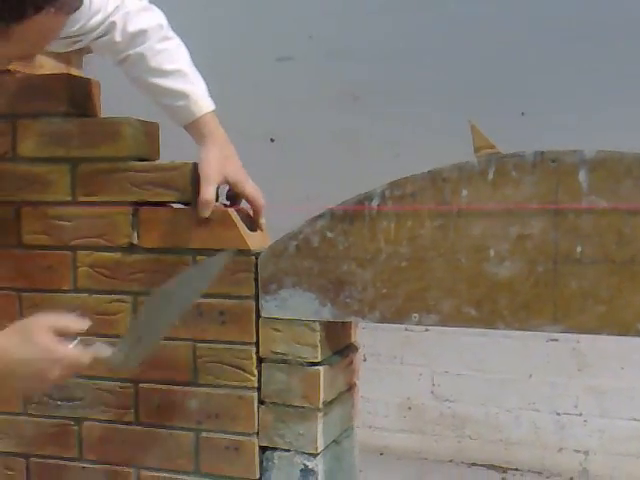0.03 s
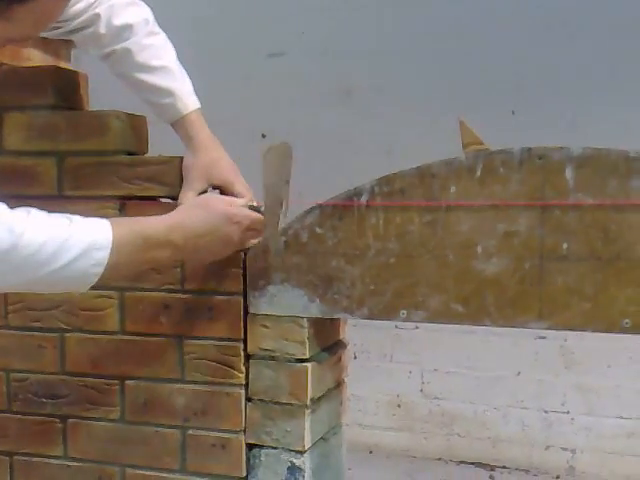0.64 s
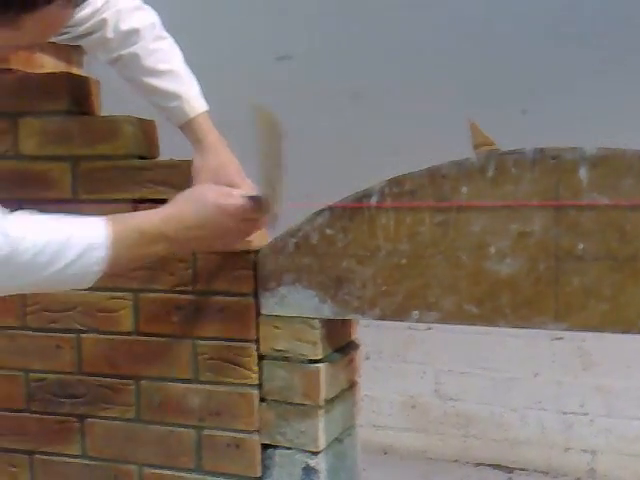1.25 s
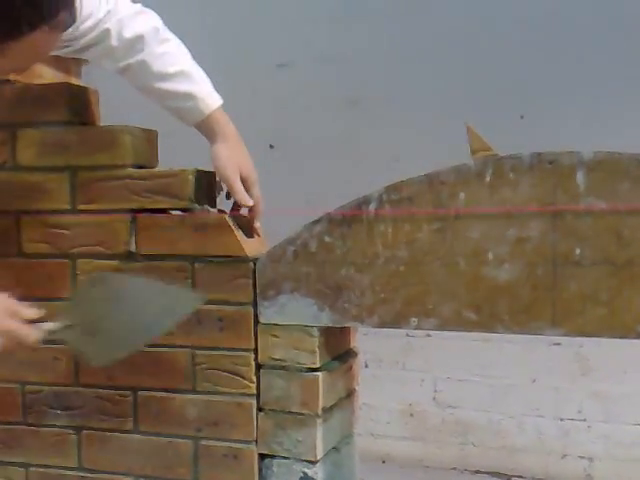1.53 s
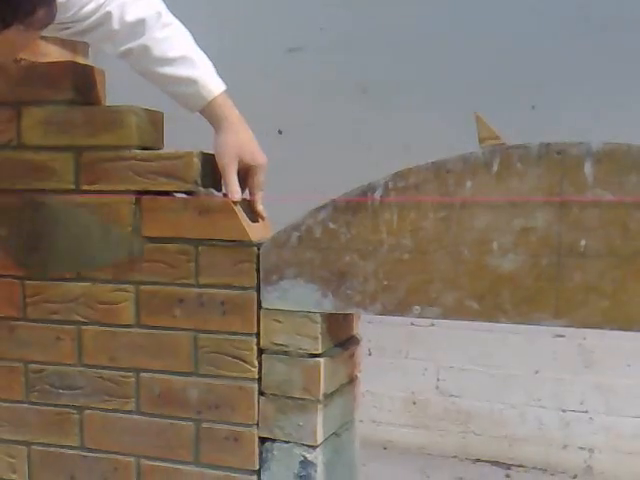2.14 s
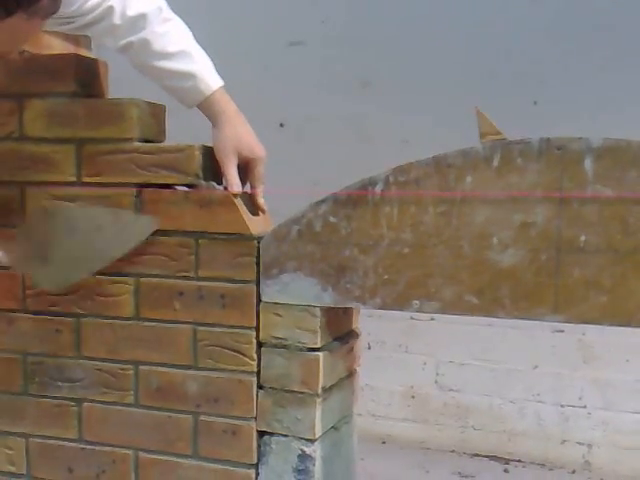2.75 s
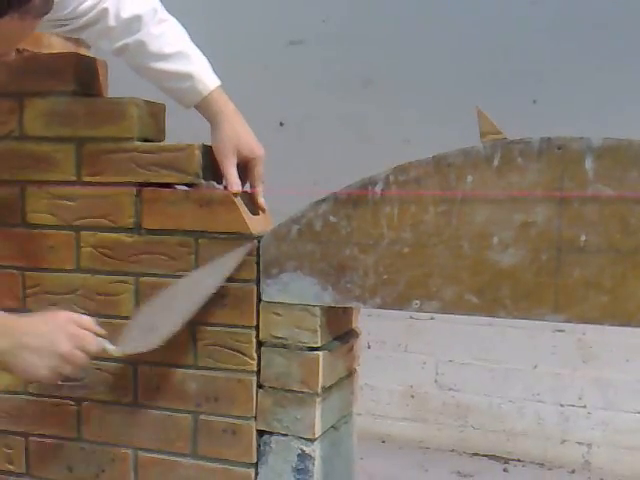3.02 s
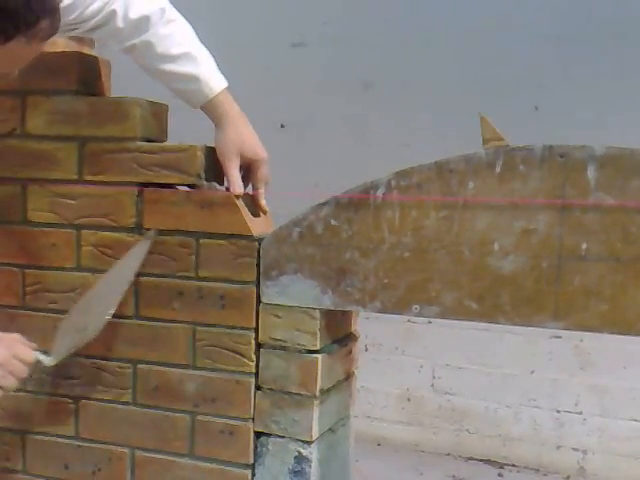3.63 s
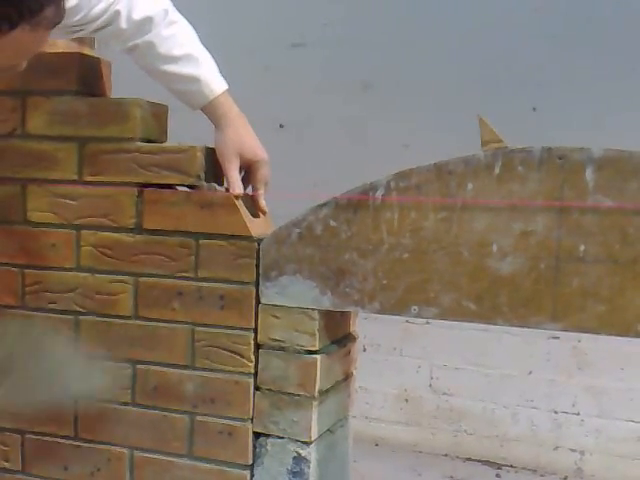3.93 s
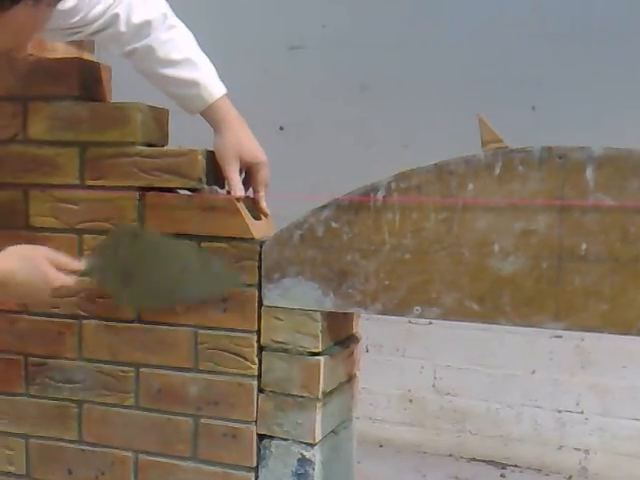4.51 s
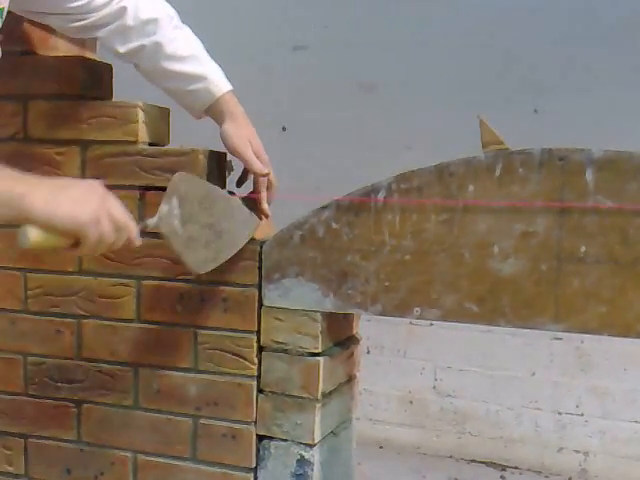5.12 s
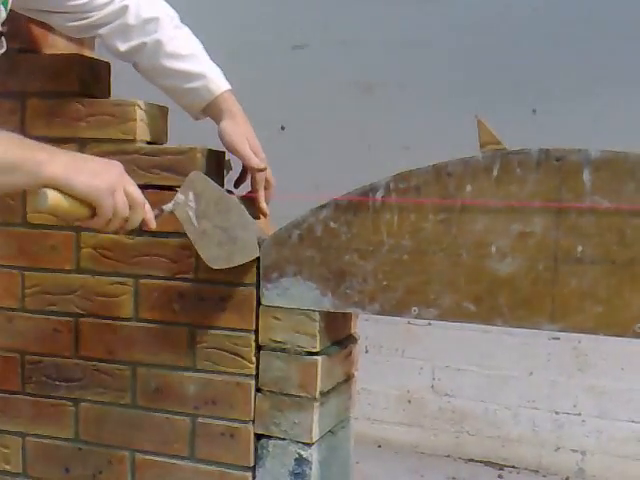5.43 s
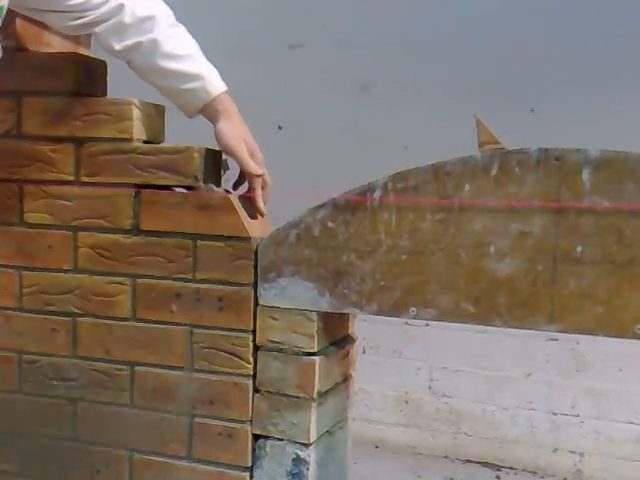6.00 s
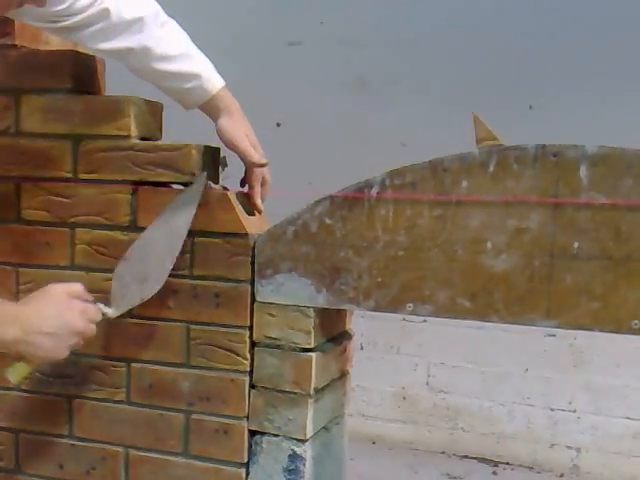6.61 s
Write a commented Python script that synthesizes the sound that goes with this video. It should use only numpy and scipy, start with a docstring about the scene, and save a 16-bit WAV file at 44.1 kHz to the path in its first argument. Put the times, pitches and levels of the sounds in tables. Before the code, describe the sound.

A bricklayer's trowel strikes brick with a sharp, ringing scrape, then three handle taps bed the brick. Short sandy strokes cut mortar off the wall, some squealing and leaving a metallic ring, mixed with slower grinding drags. Near the end wet mortar plops down and the blade clinks and scrapes once more. Everything is close to one microphone, with a light workshop echo and a quiet, steady rumble.

```python
"""A steel trowel clinks on brick and scrapes off with a squeal, close to one microphone in a workshop.
The bricklayer beds the brick with three taps of the handle, a crumb falls, and strokes cut the mortar
off the wall. Sand grinds under the blade, which is damped while it presses on the brick and rings when
it comes free. Late on, a wet lump drops to the floor. Farther off, the hall answers over a low rumble."""
import sys
import numpy as np
from scipy import signal
from scipy.fft import rfft, irfft, next_fast_len
from scipy.io import wavfile
from scipy.ndimage import map_coordinates

SR = 44100
rng = np.random.default_rng(int(sys.argv[2]) if len(sys.argv) > 2 else 0)


def to_wav(sig):
    """Store sig (one row per channel, or 1-D mono) as 16-bit WAV at the path in sys.argv[1].

    Samples outside -1..1 are clipped; the rate is SR.
    """
    pcm = np.clip(np.atleast_2d(sig), -1, 1) * 32767
    pcm = np.round(pcm).astype(np.int16)
    wavfile.write(sys.argv[1], SR, pcm.T)  # frames by channels


N = 302526
TIME = np.arange(N) / SR


def amp(db):
    """Decibels to gain."""
    return 10 ** (np.asarray(db) / 20)


def unit(x):
    """Scale to rms 1."""
    return x / np.sqrt(np.mean(x ** 2) + 1e-20)


def along(points, hz):
    """Read (Hz, value) points on a log frequency axis."""
    freqs, values = np.transpose(points)
    return np.interp(np.log(hz + 1), np.log(freqs + 1), values)


def filtered(x, response):
    """Filter x by a gain given as a function of Hz."""
    size = next_fast_len(len(x) + 8192)
    return irfft(rfft(x, size) * response(np.fft.rfftfreq(size, 1 / SR)), size)[:len(x)]


def coloured(x, spectrum):
    """Shape x by a (Hz, dB) spectrum, at rms 1."""
    return unit(filtered(x, lambda hz: amp(along(spectrum, hz))))


def resonant(x, modes):
    """Pass x through (Hz, width in Hz, dB) resonances, at rms 1."""
    def response(f):
        return sum(amp(db) * 1j * f * width / (hz * hz - f * f + 1j * f * width)
                   for hz, width, db in modes)
    return unit(filtered(x, response))


def wobble(knots_per_s, size):
    """A smooth random curve."""
    knots = rng.standard_normal(int(size * knots_per_s / SR) + 4)
    return map_coordinates(knots, [np.arange(size) * knots_per_s / SR])


def blow(t60, attack_s, size):
    """Envelope of a blow: a quick rise and an exponential fall."""
    return amp(-60 * TIME[:size] / t60) * (1 - np.exp(-TIME[:size] / attack_s))


def choke(t, half_s):
    """Gain of a ring as the fist damps it, down to half at half_s."""
    return 1 / (1 + (np.maximum(t, 0) / half_s) ** 4)


def add(track, start_s, x):
    """Mix x into the track from start_s on."""
    start = min(max(round(start_s * SR), 0), N)
    track[start:start + len(x)] += x[:N - start]


def sand(size, clump_db=1.0, grain_db=3.0):
    """Force of sand grains breaking under the edge, in clumps."""
    return rng.standard_normal(size) * amp(grain_db * wobble(2500, size) + clump_db * wobble(169, size))


def upper_modes(force, count=58, width_hz=70, spread_db=-4.0):
    """The thin blade's crowded modes from 3 to 15 kHz; every point of contact picks others."""
    draws = rng.random((count, 2))
    return resonant(force, [(3000 + 12000 * place, width_hz, spread_db * drop) for place, drop in draws])


# Sand hiss at close range, under the edge and under the flat blade.
# Each row: frequency in Hz, level in dB.
EDGE_HISS = [(400, -22.5), (1500, -14), (3000, -1.5), (4500, 1), (7500, 0), (11000, -2), (14000, -4),
             (16000, -10.5)]
FLAT_HISS = [(400, -42), (3000, 0), (6400, -1.5), (7300, 3), (8600, -1.5), (12000, 1), (16000, -8.5)]


def grinding(force, grip, steel_share=0.58):
    """Sand hisses, partly sung by upper modes that trade places as the edge travels."""
    turn = wobble(17.7, len(force))
    steel = unit(np.cos(turn) * upper_modes(force) + np.sin(turn) * upper_modes(force))
    hiss = np.sqrt(steel_share) * steel + np.sqrt(1 - steel_share) * unit(force)
    return coloured(hiss, FLAT_HISS if grip == "flat" else EDGE_HISS)


# The steel blade's modes. Each row: frequency in Hz, level in dB when struck at the edge,
# level in dB when struck through the handle, free t60 in seconds.
BLADE_MODES = [(604, -8, -27, 0.73), (762, -12.5, -14, 0.57), (923, -8.5, -30, 0.15),
               (1147, -10, -51.5, 0.4), (1247, -11, -34, 1), (1416, -11.5, -4.5, 0.47),
               (1784, -14, -19.5, 1.5), (1882, -6.5, -0.5, 0.75), (2052, -13.5, -13, 0.64),
               (2267, -7, -15, 0.37), (2368, -10.5, -22, .65), (2429, -5.5, -20.5, 0.8),
               (2623, -9.5, -16, 0.31), (2961, -9.5, -20, 0.65), (3030, -11, -31, 0.77),
               (3230, -9.5, -53, 0.24), (3600, -15, -34, 1.1), (3720, -8.5, -46, 0.19),
               (4355, -7.5, -51, 0.22), (5180, -16, -47, 0.361), (6820, -13.5, -42, 0.3)]


def pressed_blade(force, width_hz=16, widening=0.003, detune=0.004):
    """The blade held against brick: its modes are broad and shift with the point of contact."""
    shifts = 1 + detune * rng.standard_normal(len(BLADE_MODES))
    return resonant(force, [(hz * shift, width_hz + widening * hz, db)
                            for (hz, db, _, _), shift in zip(BLADE_MODES, shifts)])


# The blade at the wall: edge on brick, flat in the mortar, edge in the upright joint.
# Each row: frequency in Hz, level in dB.
EDGE_CRUNCH = [(60, -25.5), (200, -1), (380, -21.5), (540, 5), (730, -4.5), (900, 1.5), (1500, 1),
               (2500, -5), (3900, -6), (4380, -2), (5000, -15.5), (10000, -35.5)]
FLAT_SMEAR = [(60, -20), (180, 1), (300, 1), (420, -10.5), (530, 4), (605, 15.5), (700, -8.5), (1000, 1),
              (1500, -5), (1900, -13), (2330, 5), (2900, -16), (10000, -28)]
JOINT_RASP = [(200, -22), (600, -6), (950, -4), (1250, -2.5), (1620, -2), (2100, -3.5), (3500, -12),
              (5000, -9.5), (10000, -57.5)]


def body(grip, size):
    """What sounds below the hiss: crunch and pressed steel; in the joint, wet mortar smothers the steel."""
    if grip == "flat":
        return amp(-0.5) * (coloured(sand(size), FLAT_SMEAR) + pressed_blade(sand(size)))
    if grip == "joint":
        return amp(-1.0) * coloured(sand(size), JOINT_RASP)
    return amp(-8.5) * coloured(sand(size), EDGE_CRUNCH) + amp(-3.0) * pressed_blade(sand(size))


# How unevenly the sand breaks. Each entry: grip, level swing in dB.
CLUMPING_DB = {"edge": 1.1, "flat": 2.4, "joint": 2.6}


def stroke(swell, hold, release, landing_db, grit_db, body_db, grip, touch_s=0.000603, body_lingers=1.38):
    """The blade lands, settles, holds and lifts; grit and body follow the pressure."""
    size = round((swell + hold + release) * SR)
    t = TIME[:size]
    pressure = (1 - np.exp(-t / touch_s)) * amp(landing_db * np.maximum(1 - t / swell, 0))
    lift_db = -60 * np.maximum(t - swell - hold, 0) / release
    hiss = amp(grit_db + lift_db) * grinding(sand(size, CLUMPING_DB[grip]), grip)
    crunch = amp(body_db + lift_db / body_lingers) * body(grip, size)
    return pressure * (hiss + crunch)


# Quick cuts near the microphone. Each row: start, swell, hold and the grit's release t60 in seconds,
# landing pressure in dB relative to the hold, then grit, body and ring levels in dB.
EDGE_CUTS = [(0.0, 0.0059, 0.028, 0.16, 9.5, -28, -20, -48),
             (2.302, 0.058, .028, 0.23, -2.5, -22, -24, -40),
             (2.565, 0.036, .044, 0.21, -11.5, -19.5, -26, -33.5),
             (2.755, 0.05, .034, 0.24, -15, -26.5, -25, -32.5),
             (4.476, 0.062, 0.0051, 0.2, -11.5, -22, -21.5, -56),
             (4.649, .056, .008, 0.22, -20.5, -19, -23, -36.5),
             (6.797, 0.065, 0.0267, .25, -8, -31.5, -28, -45)]


def cuts(level_db=-0.45):
    """The blade, on its edge, cuts mortar off the wall."""
    out = np.zeros(N)
    for start, *motion, _ in EDGE_CUTS:
        add(out, start, stroke(*motion, "edge"))
    return amp(level_db) * out


def jolt(grip, crunch_db, t60, attack_s):
    """A short burst of grit and crunch from steel that is already in motion."""
    size = SR // 4
    scrape = grinding(sand(2 * size), grip) + amp(crunch_db) * body(grip, 2 * size)
    return blow(t60, attack_s, size) * scrape[size:]


# Steel meets brick. Each row: start in seconds, level in dB, crunch offset in dB, ring level in dB.
BRICK_CLINKS = [(0.003, -7, -14.5, -21), (0.0524, -10, -3.5, -55), (2.2524, -41.5, 5.5, -46.5),
                (2.5329, -33.5, 10.5, -31.5), (2.584, -17, 3.5, -45), (2.755, -19.5, -6.5, -44),
                (3.3503, -40.5, 12, -39.5), (4.1871, -42, -8, -67.5), (4.48, -18, -0.5, -39),
                (4.6503, -15.5, -6, -42), (5.2812, -20, -7.5, -39), (5.3478, -26.5, -4.5, -68),
                (6.2057, -38.5, -7.5, -57), (6.796, -13.5, -9, -47)]


def clinks(level_db=-6.5, crunch_db=5.5):
    """The edge crunches as it meets the brick."""
    out = np.zeros(N)
    for start, db, offset_db, _ in BRICK_CLINKS:
        burst = jolt("edge", crunch_db + offset_db, t60=0.088, attack_s=0.0037)
        add(out, start, amp(db + level_db) * burst)
    return out


def squeal(hz, swell, t60, bites, rough=0.46, flutter_db=0.9):
    """One mode builds for two swells up to each (seconds, dB) bite, rough when loud, cleaner as it dies."""
    power = np.zeros(N)
    for peak_s, db in bites:
        start = max(peak_s - 2 * swell, 0)
        t = start + TIME[:SR] - peak_s
        rise = np.cos(np.clip(t / (2 * swell), -1, 0) * np.pi / 2) ** 2
        envelope = amp(db - 60 * np.maximum(t, 0) / t60) * rise * choke(t, half_s=0.26)
        add(power, start, envelope ** 2)
    out, live = np.zeros(N), power > 0
    level, size = np.sqrt(power[live]), np.count_nonzero(live)
    phase = 2 * np.pi * (hz * TIME[live] + rng.random())
    phase += rough * np.sqrt(level / level.max()) * wobble(hz / 10, size)
    out[live] = level * amp(flutter_db * wobble(40, size)) * np.sin(phase)
    return out


# Modes that stick and slip can feed. Each entry: name, then frequency in Hz, swell and t60 in seconds.
SQUEAL_MODES = {"lowest": (603, .014, 0.62), "low": (1247, 0.0416, 0.7), "middle": (1413, .011, .31),
                "upper": (2272, 0.0164, 0.27), "high": (2429, 0.014, .54), "higher": (2963, .014, 0.44)}
# The edge bites. Each row: loudest moment in seconds, mode name, level in dB.
EDGE_BITES = [(0.03, "high", -18.5), (0.03, "higher", -37), (0.045, "lowest", -17), (0.22, "low", -37.5),
              (2.323, "middle", -21.5), (2.372, "upper", -25.5), (2.385, "high", -30),
              (2.39, "middle", -21.5), (2.595, "middle", -15.5), (2.622, "high", -24),
              (2.626, "middle", -38), (2.638, "upper", -24), (2.812, "middle", -26.5),
              (2.835, "high", -27.5), (2.85, "higher", -31.5), (2.871, "middle", -32.5), (3.04, "low", -49),
              (3.364, "upper", -43.5), (3.53, "high", -36), (3.659, "high", -33), (3.84, "upper", -34.5),
              (4.525, "middle", -27), (4.545, "high", -30), (4.707, "middle", -31.5),
              (4.719, "lowest", -26.5), (4.722, "upper", -26), (4.724, "higher", -30),
              (4.835, "upper", -36.5), (4.87, "lowest", -39), (6.858, "lowest", -36),
              (6.819, "middle", -32.5)]
# The tip skids over the brick once. Each row: frequency in Hz, level in dB, swell and t60 in seconds.
TIP_SCREECH = [(5160, -20, 0.012, 0.07), (7150, -17, 0.00702, 0.057), (8400, -19.5, 0.00526, 0.036)]
# The edge slips in the joint. Each row: loudest moment in seconds, frequency in Hz, level in dB.
JOINT_CHIRPS = [(5.61, 1610, -28.5), (5.659, 1630, -29.5), (5.723, 1595, -22.5), (5.745, 1543, -36),
                (5.776, 1666, -37)]


def squeals(screech_s=0.013):
    """Stick and slip: the edge squeals, the flat blade hums, the tip screeches and the joint chirps."""
    out = np.zeros(N)
    for name, mode in SQUEAL_MODES.items():
        out += squeal(*mode, [(peak_s, db) for peak_s, fed, db in EDGE_BITES if fed == name])
    for start, swell, hold, *_, body_db, grip in SLOW_DRAGS:
        if grip == "flat":  # the lowest mode sings late in the hold
            bite = (start + swell + 0.9 * hold, body_db + 5)
            out += squeal(BLADE_MODES[0][0], swell=0.05, t60=0.25, bites=[bite], rough=1.9)
    for hz, db, swell, t60 in TIP_SCREECH:
        out += squeal(hz, swell, t60, [(screech_s, db)])
    for peak_s, hz, db in JOINT_CHIRPS:
        out += squeal(hz, swell=0.0027, t60=0.057, bites=[(peak_s, db)], rough=1.9)
    return out


def free_blade(levels_db, attack_s, scatter_db=1.8, waver_rad=0.34):
    """The free blade rings; each mode swells and fades as the hand turns it."""
    ring, t = np.zeros(SR), TIME[:SR]
    for (hz, _, _, t60), db in zip(BLADE_MODES, levels_db):
        turning = amp(db + scatter_db * wobble(13.9, SR))
        phase = 2 * np.pi * (hz * t + rng.random()) + waver_rad * wobble(50.25, SR)
        ring += turning * blow(t60, attack_s, SR) * np.sin(phase)
    return ring * choke(t, half_s=0.46)


def rings(level_db=-1.0, firm_db=-29.5, dulling=0.35, knee_hz=2200):
    """At each clink and after each cut the blade springs free and rings; a softer touch rings duller."""
    out = np.zeros(N)
    releases = [(start + swell + hold, db) for start, swell, hold, *_, db in EDGE_CUTS]
    releases += [(start, db) for start, *_, db in BRICK_CLINKS]
    for start, db in releases:
        db_per_octave = dulling * min(db - firm_db, 0)
        levels = [edge_db + db_per_octave * max(np.log2(hz / knee_hz), 0)
                  for hz, edge_db, _, _ in BLADE_MODES]
        add(out, start, amp(db + level_db) * free_blade(levels, attack_s=0.0039))
    return out


# The workshop's decay, all round the microphone. Each row: frequency in Hz, t60 in seconds.
HALL_DECAY = [(150, 0.8), (600, 0.86), (2000, 1.0), (4000, 1), (8000, 0.54), (15000, 0.4)]


def hall(x, build_s=0.0028, travel_per_s=3):
    """The workshop's diffuse answer; treble dies first, and the echoes change as the trowel travels."""
    hz, t, noise = signal.stft(rng.standard_normal((2, SR + SR // 4)), SR, nperseg=256)
    decay = amp(-60 * t / along(HALL_DECAY, hz)[:, None])
    _, tails = signal.istft(noise * decay * (1 - np.exp(-t / build_s)), SR, nperseg=256)
    turn = wobble(travel_per_s, N)
    return sum(signal.fftconvolve(x * share, tail / np.linalg.norm(tail))[:N]
               for share, tail in zip((np.cos(turn), np.sin(turn)), tails))


# Room tone where the microphone stands. Each row: frequency in Hz, relative level in dB.
ROOM_TONE = [(12, -39), (20, -7), (81, -2.5), (145, -11.5), (192, -10), (292, -18), (482, -16),
             (997, -28.5), (1600, -33.5), (2120, -33.5), (15800, -44.5)]


def rumble(level_db=-50.5):
    """A steady low rumble fills the workshop."""
    return amp(level_db) * coloured(rng.standard_normal(N), ROOM_TONE)


# The handle's butt on the brick, close by.
# Each row: start in seconds, level in dB, then click and blade ring in dB relative to that level.
HANDLE_TAPS = [(0.857, -20, -21.5, -13.5), (1.093, -16.5, -24, -11), (1.322, -13.5, -5, -8.5)]
# The bedded brick's modes. Each row: frequency in Hz, level in dB, t60 in seconds.
BRICK_MODES = [(174, -12.5, 0.28), (286, -8, 0.086), (377, -2, 0.06), (578, 5, 0.039), (678, -0.5, 0.075),
               (980, 0.5, 0.076), (1390, 5.5, 0.11)]
# The handle's knock and the blade's click. Each row: frequency in Hz, level in dB.
HANDLE_KNOCK = [(60, -27), (200, -1), (450, 2), (800, 0.5), (1350, 4.5), (2000, -1), (2600, -14),
                (3700, -13), (4600, -30), (15000, -46)]
BLADE_CLICK = [(1500, -8.5), (3600, 6), (4500, -8.5), (5400, -3), (8000, -13), (15000, -16)]


def taps(brick_db=-10.0, knock_db=-5.5, fist_closes_s=1.67, stilling_s=0.025):
    """The handle knocks the brick; the blade clicks and sings until the next blow or the fist stops it."""
    knocks, steel, size = np.zeros(N), np.zeros(N), SR // 4
    stops = [start for start, *_ in HANDLE_TAPS[1:]] + [fist_closes_s]
    handle_levels = [db for _, _, db, _ in BLADE_MODES]
    for (start, db, click_db, ring_db), stop in zip(HANDLE_TAPS, stops):
        brick = np.zeros(size)
        for hz, mode_db, t60 in BRICK_MODES:
            envelope = amp(mode_db + rng.normal()) * blow(t60, 0.0018, size)
            brick += envelope * np.sin(2 * np.pi * (hz * TIME[:size] + rng.random()))
        thud = blow(0.13, 0.001, size) * coloured(rng.standard_normal(size), HANDLE_KNOCK)
        click = blow(0.046, 0.0012, size) * coloured(rng.standard_normal(size), BLADE_CLICK)
        ring = free_blade(handle_levels, attack_s=0.042, scatter_db=2.5)
        undamped = np.clip((stop - start - TIME[:len(ring)]) / stilling_s, 0, 1)
        add(knocks, start, amp(db) * (amp(brick_db) * brick + amp(knock_db) * thud))
        add(steel, start, amp(db + click_db) * click)
        add(steel, start, amp(db + ring_db) * undamped * ring)
    return knocks, steel


# The blade swings round to face the microphone. Each row: centre and half width in seconds, gain in dB.
BLADE_TURNS = [(1.585, 0.07, 10.5), (4.885, 0.081, 4.5)]


def facing():
    """Gain of the ringing blade, which sounds loudest off its face."""
    return amp(sum(db * np.exp(-((TIME - centre) / width) ** 2) for centre, width, db in BLADE_TURNS))


# Mortar lands on the floor nearby. Each row: start in seconds, level in dB.
MORTAR_LANDINGS = [(1.921, -50.5), (6.324, -42), (6.357, -30)]
# The splat of each landing. Each row: frequency in Hz, level in dB.
MORTAR_SPLAT = [(250, -13), (600, 5), (1200, -5), (2000, -11.5), (3000, -3.5), (4200, -15), (15000, -21)]
# A chip pings, a lump thuds. Each row: start in seconds, frequency in Hz, level in dB, t60 in seconds.
LANDING_TONES = [(1.918, 3106, -31.5, 0.013), (6.359, 234, -21.5, 0.07), (6.362, 110.4, -38, 0.43)]


def droppings():
    """Crumbs of mortar tick on the floor and one wet lump thuds."""
    out, size = np.zeros(N), SR // 2
    for start, db in MORTAR_LANDINGS:
        splat = coloured(rng.standard_normal(size), MORTAR_SPLAT)
        add(out, start, amp(db) * blow(0.029, 0.00043, size) * splat)
    for start, hz, db, t60 in LANDING_TONES:
        add(out, start, amp(db) * blow(t60, 0.0019, size) * np.sin(2 * np.pi * hz * TIME[:size]))
    return out


# Slow drags along the near wall. Each row: start, swell, hold and the grit's release t60 in seconds,
# landing pressure in dB relative to the hold, grit and body levels in dB, grip.
SLOW_DRAGS = [(3.351, .004, 0.11, 0.28, 1.5, -67, -43.5, "edge"),
              (3.437, 0.089, 0.39, 0.099, -10.5, -33, -38, "flat"),
              (5.373, 0.1, 0.019, 0.63, -10.5, -37, -42, "joint"),
              (5.604, 0.0042, 0.054, 0.28, -1, -46.5, -39.5, "joint"),
              (5.692, 0.021, 0.12, 0.22, -10, -42.5, -36.5, "joint")]


def drags(level_db=-0.45):
    """The blade is drawn lightly on its edge, flat through the mortar, then in the upright joint."""
    out = np.zeros(N)
    for start, *motion in SLOW_DRAGS:
        add(out, start, stroke(*motion))
    return amp(level_db) * out


# The coarsest grains in the blade's path. Each row: start in seconds, level in dB.
COARSE_GRAINS = [(3.446, -23), (3.5215, -10.5), (3.548, -17.5), (3.564, -17), (3.61, -13), (3.649, -21.5),
                 (3.7093, -16), (3.769, -20.5), (3.822, -13), (5.4495, -20.5), (5.4855, -18),
                 (5.533, -24.5), (5.5516, -17), (5.608, -16), (5.718, -16.5)]


def catches(level_db=-8.5, small_per_s=14, above_grit_db=8, spread_db=1.5):
    """A dragged edge jolts over coarse grains, and over smaller ones scattered through the holds."""
    out, grains = np.zeros(N), list(COARSE_GRAINS)
    for start, swell, hold, _, _, grit_db, _, _ in SLOW_DRAGS:
        for place, size in rng.random((round(small_per_s * hold), 2)):
            db = grit_db + above_grit_db + spread_db * (2 * size - 1)
            grains.append((start + swell + hold * place, db))
    for caught_s, db in grains:
        grip = [grip for start, *_, grip in SLOW_DRAGS if start <= caught_s][-1]
        burst = jolt(grip, crunch_db=-9.5, t60=0.059, attack_s=0.0022)
        add(out, caught_s, amp(db + level_db) * burst)
    return out


def scene(trowel_wet_db=-13.5, knock_wet_db=-7.5):
    """Trowel and wall close to the microphone; the knocked wall throws more of its sound into the hall."""
    knocks, tapped_steel = taps()
    scraping = cuts() + drags() + catches() + clinks()
    ringing = facing() * (squeals() + rings() + tapped_steel)
    near = scraping + ringing + droppings()
    into_hall = amp(trowel_wet_db) * near + amp(knock_wet_db) * knocks
    return (near + knocks + rumble() + hall(into_hall))[None]


def record(dry, top_hz=15950):
    """One microphone, with nothing kept above the band limit."""
    return filtered(dry[0], lambda hz: hz < top_hz)[None]


dry = scene()
out = record(dry)
to_wav(out)
```